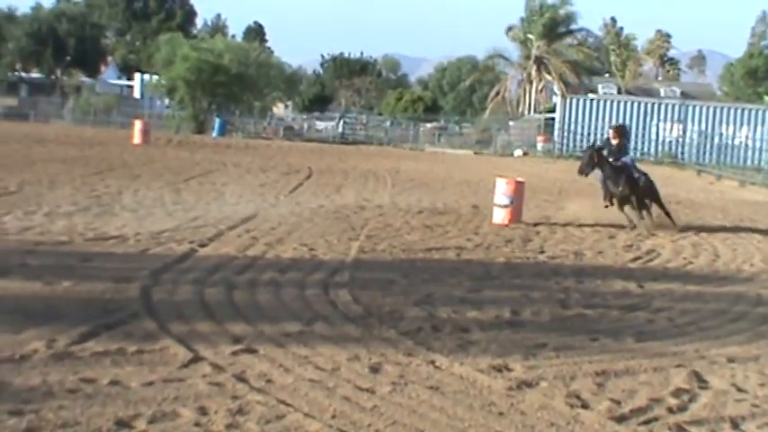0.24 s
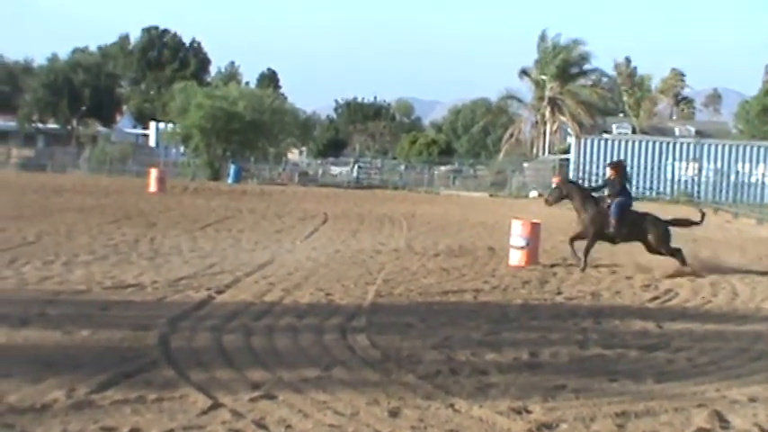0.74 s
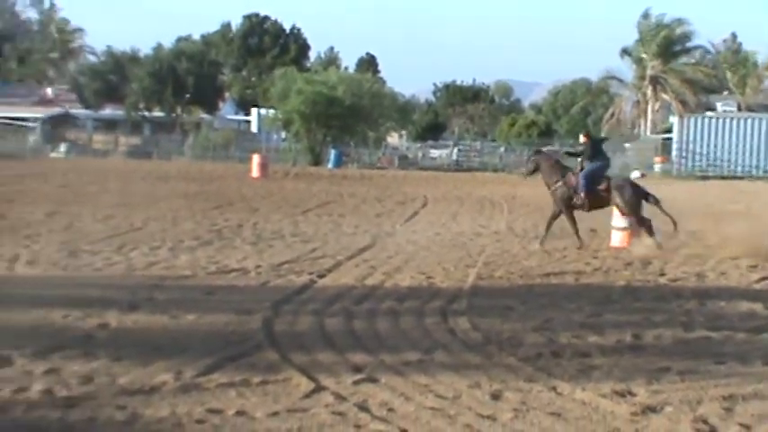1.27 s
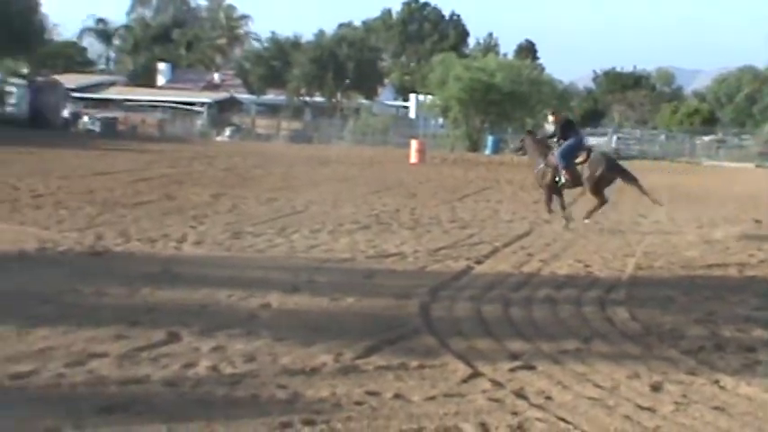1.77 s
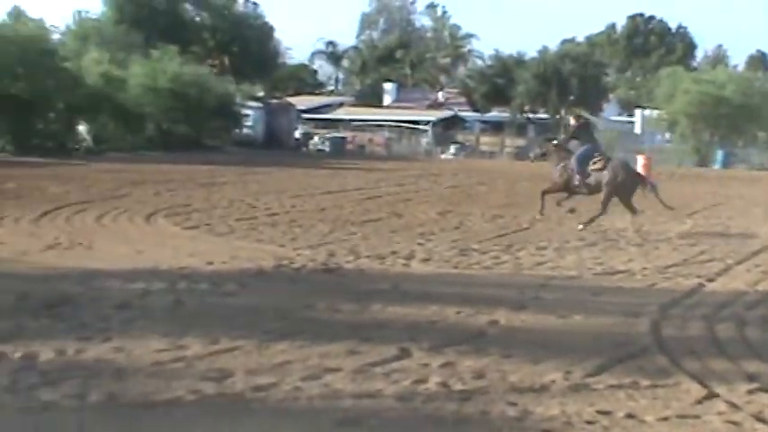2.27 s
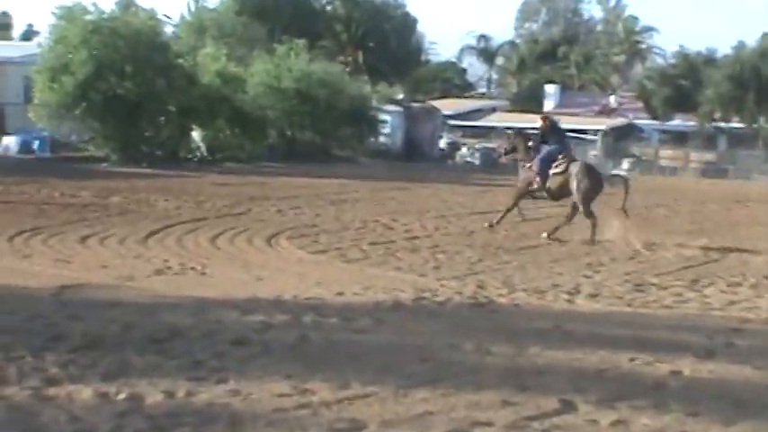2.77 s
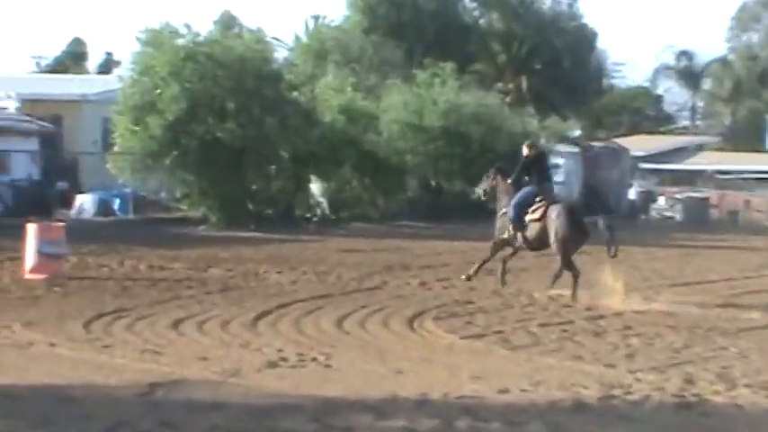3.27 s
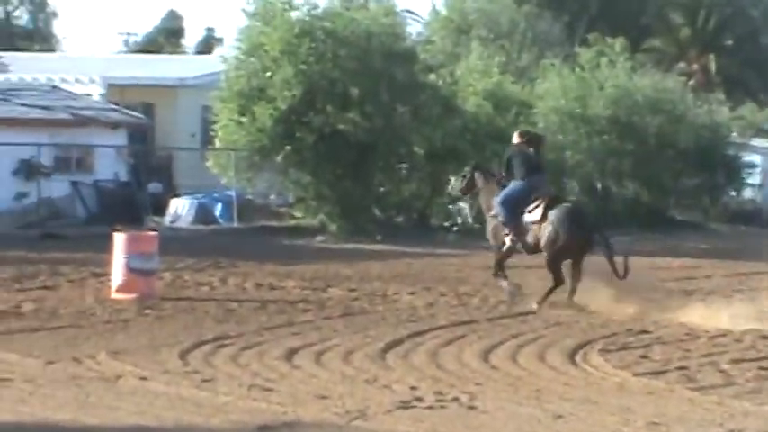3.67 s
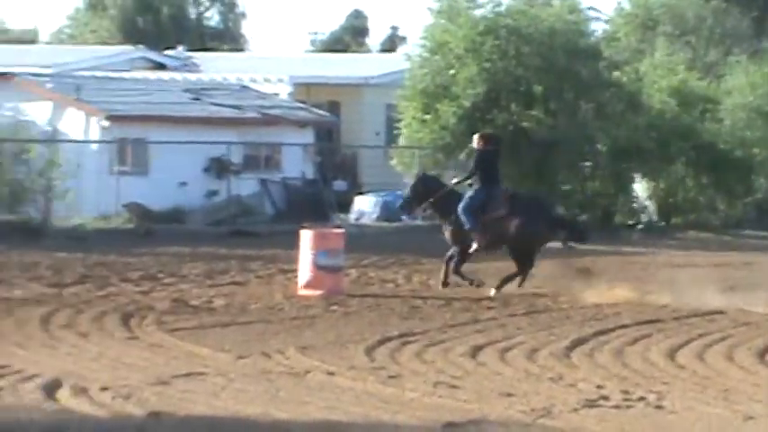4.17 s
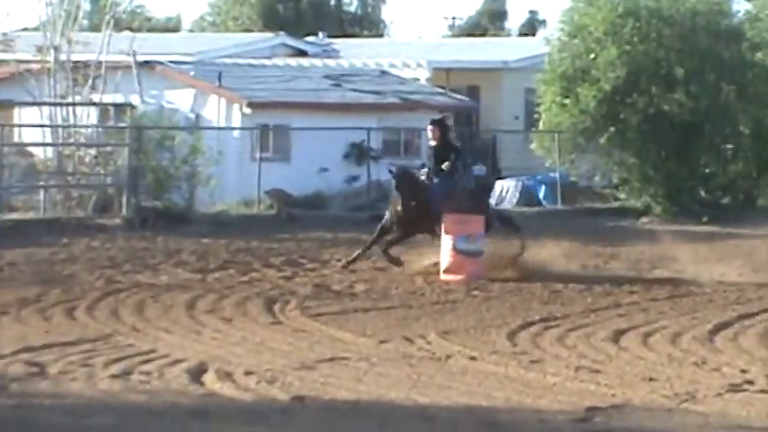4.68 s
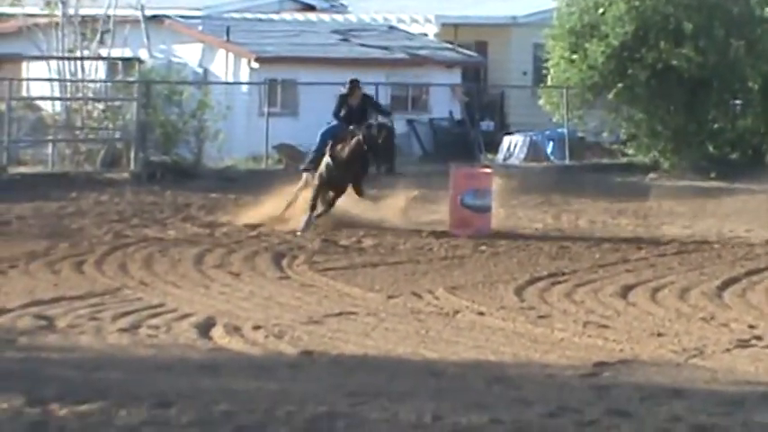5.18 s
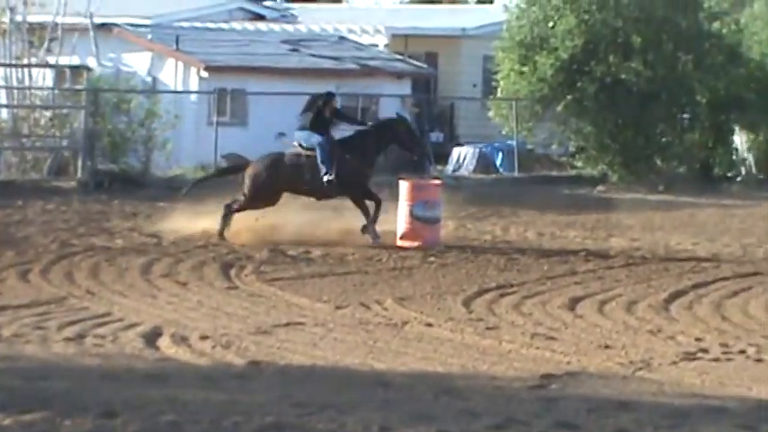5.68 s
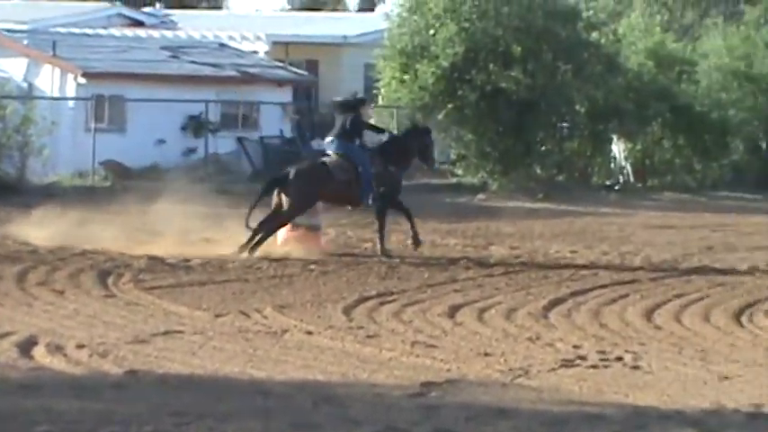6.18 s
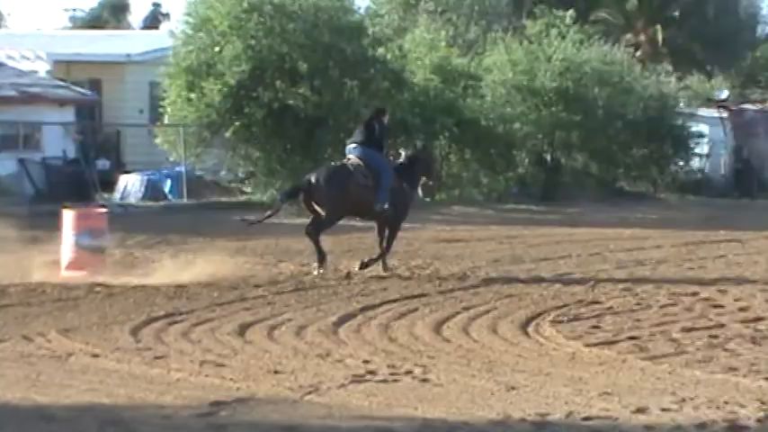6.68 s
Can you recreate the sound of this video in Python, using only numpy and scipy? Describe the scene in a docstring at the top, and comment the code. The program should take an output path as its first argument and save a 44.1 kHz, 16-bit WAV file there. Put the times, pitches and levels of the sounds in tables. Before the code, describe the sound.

Outdoors in an open dirt arena, wind strikes a handheld stereo microphone and dominates. Separate puffs with short lulls come first, then from about two seconds a lasting low roar with dull slaps. Quiet birds chirp and whistle throughout, clearest early on; riding tack ticks and a few sharp smacks snap out, and a faint high insect buzz hangs in the middle. Soft hiss of sand and leaves lies underneath.

```python
"""Gusty wind buffets the two microphone ports of a camera in a sandy arena and dominates the sound. It is
turbulence noise in half-octave bands whose level and sharpness follow puffs, with short dull slaps. Above it
birds whistle and chatter (gliding tones, chopped noise) and an insect buzzes (a wavering tone). Tack ticks
(brief rings), the camera body is knocked (sharp noise bursts), and far sand and leaves hiss (grainy soft
noise)."""
import sys
import numpy as np
from scipy import signal
from scipy.fft import rfft, irfft, next_fast_len
from scipy.io import wavfile
from scipy.ndimage import uniform_filter1d

SR = 44100
rng = np.random.default_rng(int(sys.argv[2]) if len(sys.argv) > 2 else 0)


def persist_wave(psi):
    """Save psi, clipped to +-1, as 16-bit WAV."""
    counts = np.round(np.clip(psi, -1, 1) * 32767).astype(np.int16)
    wavfile.write(sys.argv[1], SR, np.atleast_2d(counts).T)


N = 306054
OPPOSITE = np.array([[1], [-1]])  # signs of a difference signal at the left and right ports

# Strong single eddies striking the ports: time_s, level_db (peak of the part common to both ports)
EDDY_STRIKES = [(0.773, -27.5), (1.332, -33), (2.385, -20), (2.463, -22), (2.805, -25), (2.884, -19),
                (3.233, -17), (3.668, -21), (3.82, -20), (3.982, -19), (4.135, -20), (4.425, -14),
                (4.66, -22), (4.841, -18), (5.05, -20), (5.289, -19), (5.544, -17), (5.826, -20.5),
                (6.228, -21)]


def undb(db):
    """Amplitude ratio of a level: 20 dB is a factor of ten."""
    return 10 ** (np.asarray(db) / 20)


def unit(x):
    """Normalise to unit rms, the root of the mean power."""
    return x / np.sqrt(np.mean(x ** 2))


def curves(table):
    """Linear interpolation of each column after the first, over time in seconds."""
    time_s, *columns = np.transpose(table)
    return [np.interp(np.arange(N) / SR, time_s, column) for column in columns]


def band(x, spectrum, hz=None, octaves=0.49):
    """Linear filtering by a spectrum; with hz, a cosine window on log frequency keeps one band."""
    size = next_fast_len(N)
    log_f = np.log2(np.maximum(np.fft.rfftfreq(size, 1 / SR), 1))
    point_hz, point_db = np.array(spectrum).T
    gain = undb(np.interp(log_f, np.log2(point_hz), point_db, -90, -90))
    if hz:
        gain = gain * np.cos(np.pi / 2 * np.clip((log_f - np.log2(hz)) / octaves, -1, 1))
    return irfft(rfft(x, size) * gain, size)[:N]


def walk(rate):
    """Low-pass random modulation: levels held 1 / rate s, smoothed twice, standard deviation 1."""
    hold = int(SR / rate)
    x = np.repeat(rng.standard_normal(N // hold + 1), hold)
    x = uniform_filter1d(uniform_filter1d(x, hold), hold)[:N]
    return x / x.std()


def flutter(rate, slowest):
    """Band-pass random modulation: a walk less its moving average over 1 / slowest s, at unit rms."""
    x = walk(rate)
    return unit(x - uniform_filter1d(x, int(SR / slowest)))


def panned(x, pan_db):
    """Interaural level difference: left exceeds right by pan_db."""
    return x * undb(np.array([[pan_db], [-pan_db]]) / 2)


def add(out, s, x):
    """Superposition: mix x into out from time s."""
    i = int(s * SR)
    out[:, i:i + x.shape[-1]] += x[..., :N - i]


def wind():
    """Turbulence: eddies of many sizes press on the ports; small ones burst, so upper bands throb together."""
    # Relative spectrum of the pressure common to both ports: frequency_hz, density_db
    alike_spectrum = [(12, -45.5), (20, -7.5), (160, 0.5), (277, -3), (424, -7), (692, -16.5), (1150, -28),
                      (1950, -44.5), (2600, -53.5), (3380, -62), (5720, -120)]
    # Relative spectrum of the pressure of opposite sign at the ports: frequency_hz, density_db
    apart_spectrum = [(12, -35.5), (20, -12), (49, -10), (226, 1), (407, -1), (588, -4.5), (920, -11),
                      (2040, -35), (2600, -41), (3380, -75), (5720, -120)]
    rumble_db, edge_db = gusts()
    blowing = np.arange(N) > 2.5 * SR
    edge_db = edge_db - edge_db[blowing].mean()  # the spectra hold the sharpness of the full wind
    relative_db = rumble_db - rumble_db[blowing].mean()
    lull_db = np.minimum(relative_db, 0)
    # weak wind throbs deeply, full wind roars more evenly
    puffy = np.clip(.75 - 0.034 * uniform_filter1d(edge_db + relative_db, SR // 3), .3, 1.6)
    eddies = 0.48 * flutter(60, 7.5) + 0.93 * flutter(200, 30)
    strokes = flutter(35, 2.4)
    rows = []
    for spectrum, level_db in ((alike_spectrum, 0), (apart_spectrum, -4.5)):
        own = flutter(90, 15)
        out = 0
        for hz in 22 * 2 ** np.arange(0, 7.1, .5):
            octave = np.log2(hz)
            depth_db = np.interp(octave, np.log2([60, 250, 600, 1500]), [.3, 2.2, 2.6, 3.6])
            gritty = np.clip(np.log2(hz / 300) / 3, 0, 1)  # slower strokes reach the upper bands only
            motion = puffy * eddies + .5 * own + 0.7 * gritty * strokes
            throb = undb(depth_db * motion + 0.8 * flutter(30, 3.7))
            stays = np.interp(octave, np.log2([60, 200]), [.2, 0])  # the deepest rumble sinks less in a lull
            tilt = np.interp(octave, np.log2([200, 500, 1500]), [0, .95, 1.2])
            noise = band(rng.standard_normal(N), spectrum, hz)
            out = out + noise * unit(throb) * undb(tilt * edge_db - stays * lull_db)
        rows.append(out * undb(level_db))
    alike, apart = np.array(rows) / rows[0][blowing].std() * undb(rumble_db)
    return np.array([alike + apart, alike - apart])


def gusts():
    """Power addition: puffs rise, hold and decay over a lull; weaker flow has less fine turbulence."""
    # Puffs on the ports, the last a lasting blow: full_s (end of the rise), held_s, rumble_db
    puffs = [(0, 0.067, -24), (0.191, 0.055, -23.5), (0.299, 0.067, -26.5), (0.371, 0.15, -17),
             (.55, 0.13, -25), (0.701, 0.024, -21.5), (.76, 0.016, -22.5), (.83, 0.057, -24),
             (.97, 0.18, -33), (1.17, 0.14, -28), (1.332, 0.073, -21), (1.46, 0.054, -24.5),
             (1.53, 0.35, -18.5), (1.981, 0.12, -32.5), (2.129, 0.03, -26.5), (2.17, 6.5, -19)]
    # The wind freshens: time_s, swell_db, sharpness_db (relative upper-band level)
    freshening = [(0, -1, -13), (1, 1, -16.5), (1.7, 0, -11.5), (2.5, 1, -10), (3.3, 1, -9), (3.7, 0, -8.5),
                  (4.2, 1, -3.5), (4.5, -2.5, -4), (4.8, -0.5, -2), (5.5, -1, -5), (5.9, 1.5, -10.5),
                  (6.3, -1, -5), (6.9, 1.5, -8.5)]
    rise_s, fall_s, lull_db = 0.011, 0.023, -41
    dull_per_db, dullest_db, full_blow_db = 1.17, -14, -20.5  # dulling stops 14 dB under a full blow
    surge_db, surge_s = 4, .014  # brief sharpening just after each slap begins
    t = np.arange(N) / SR
    power = undb(lull_db) ** 2
    for full_s, held_s, level_db in puffs:
        rise = np.clip((t - full_s) / rise_s + 1, 0, 1)
        fall = np.exp(-np.maximum(t - full_s - held_s, 0) / fall_s)
        power = power + (undb(level_db) * rise * fall) ** 2
    rumble_db = 10 * np.log10(power)
    swell_db, sharp_db = curves(freshening)
    surges = sum(np.exp(-((t - s) / surge_s - .5) ** 2) for s, _ in EDDY_STRIKES)
    dulling_db = dull_per_db * np.clip(rumble_db - full_blow_db, dullest_db, 0)
    return rumble_db + swell_db, sharp_db + surge_db * surges + dulling_db


def slaps():
    """Pressure impulses: each strong eddy is a short dull noise burst, largely opposite at the two ports."""
    out = np.zeros((2, N))
    t = np.arange(1500) / SR
    low_pass = signal.butter(5, 850, fs=SR, output="sos")
    high_pass = signal.butter(2, 220, "high", fs=SR, output="sos")
    soft = np.vstack([low_pass, high_pass])
    burst = t / .003 * np.exp(1 - t / 0.0024)
    for s, level_db in EDDY_STRIKES:
        alike, apart = signal.sosfilt(soft, rng.standard_normal((2, len(t))) * burst)
        gain = undb(level_db) / np.abs(alike).max()
        add(out, s - .0012, gain * np.array([alike + 1.98 * apart, alike - 1.55 * apart]))
    return out


def birds():
    """Frequency modulation: slightly hoarse whistles glide on parabolas, from either side, with soft echoes."""
    # The clearest notes: start_s, length_s, start_hz, mid_hz, end_hz, level_db
    clear_notes = [(0.005, 0.037, 3050, 3200, 2950, -58), (0.155, 0.028, 4500, 4350, 4250, -57),
                   (0.64, 0.13, 2050, 2020, 2050, -60), (0.79, 0.028, 3600, 3370, 3620, -54),
                   (0.84, 0.06, 4650, 4700, 4680, -61), (0.08, 0.033, 3710, 4630, 4660, -54),
                   (0.11, 0.057, 4770, 3770, 3370, -53.5), (0.255, 0.071, 4740, 4770, 4650, -58),
                   (0.535, .075, 4600, 4570, 4640, -64), (0.29, 0.042, 4020, 3440, 3050, -57),
                   (0.33, 0.048, 2990, 3650, 4760, -57.5), (0.47, 0.045, 3530, 3050, 2850, -59),
                   (0.612, 0.09, 4650, 3600, 2780, -58), (0.73, 0.041, 3860, 4800, 4470, -56.5),
                   (0.87, 0.062, 1990, 1955, 1920, -52), (0.85, 0.059, 3620, 3640, 3700, -55),
                   (1.372, 0.044, 4750, 4460, 4460, -51), (1.43, 0.025, 3210, 3100, 2910, -53),
                   (1.58, 0.14, 4270, 4360, 4380, -53.5), (1.75, 0.02, 2800, 2930, 3000, -49),
                   (1.79, 0.02, 3640, 3600, 3500, -49), (1.81, 0.028, 4300, 4160, 4100, -46),
                   (2.028, 0.04, 4700, 4560, 4650, -51), (2.03, 0.055, 2280, 2280, 2600, -53),
                   (2.07, 0.044, 3220, 3130, 2970, -50), (2.12, 0.057, 2900, 3020, 3250, -54),
                   (2.12, .065, 3680, 3650, 3600, -59), (2.405, 0.048, 3980, 4150, 4000, -50.5),
                   (2.975, .04, 4000, 3750, 3500, -59), (3.325, .042, 4550, 4800, 3800, -60),
                   (3.395, 0.025, 3600, 3850, 3950, -61), (3.425, 0.07, 4350, 4430, 4280, -58),
                   (3.6, 0.062, 3840, 3020, 2780, -54.5), (4.23, .045, 3100, 2860, 2500, -58),
                   (4.372, 0.026, 5400, 5840, 5200, -59), (4.42, 0.07, 4780, 4700, 4420, -59),
                   (4.48, 0.045, 4020, 3900, 3900, -53.5), (4.516, 0.051, 4800, 4360, 4480, -47.5),
                   (4.575, 0.025, 3986, 3910, 3800, -51.5), (5.12, 0.023, 4330, 4580, 4860, -57),
                   (5.14, 0.04, 4300, 3750, 3400, -55.5), (5.345, 0.025, 3300, 3800, 4500, -60),
                   (5.35, 0.039, 3250, 2950, 2650, -60), (4.73, .04, 4450, 4450, 4350, -60),
                   (5.21, 0.026, 5840, 5800, 5820, -52.5), (5.23, 0.022, 4380, 4380, 4500, -52),
                   (5.48, 0.08, 3280, 4200, 3900, -59), (5.56, 0.076, 3550, 3040, 2250, -53),
                   (5.7, .05, 3000, 3450, 3500, -62), (5.85, 0.03, 4250, 4600, 4650, -54),
                   (5.965, .035, 3200, 3100, 3200, -58), (6.03, 0.03, 4760, 4360, 4490, -58.5),
                   (6.23, 0.074, 3350, 4020, 3950, -53.5), (6.345, 0.035, 4470, 4770, 4320, -57),
                   (6.305, 0.06, 3330, 3140, 2730, -47.5), (6.36, 0.037, 3150, 2950, 2600, -57),
                   (6.55, 0.04, 4060, 3630, 3290, -58), (6.59, 0.029, 2940, 2970, 3020, -54),
                   (6.82, 0.045, 4450, 4780, 4300, -62), (6.88, 0.056, 3480, 4400, 2980, -59)]
    notes = [*clear_notes, *far_birds(count=220)]
    direct = np.zeros((2, N))
    waver, shiver = walk(400), walk(300)
    sides = rng.choice([-1, 1], (len(notes), 1))
    for (s, length, start_hz, mid_hz, end_hz, level_db), side in zip(notes, sides):
        u = np.arange(int(length * SR)) / (length * SR)
        here = slice(int(s * SR), int(s * SR) + len(u))
        # parabola through the start, middle and end pitches
        pitch = start_hz * (1 - u) * (1 - 2 * u) + 4 * mid_hz * u * (1 - u) + end_hz * u * (2 * u - 1)
        hoarse = 0.0007 / max(length, .02)  # short chips are rough, long whistles cleaner
        broken = 1 + np.clip(.6 - length / .25, .12, .45) * shiver[here]
        phase = 2 * np.pi * np.cumsum(pitch * (1 + hoarse * waver[here])) / SR
        fade = np.clip(np.minimum(u, 1 - u) * length / 0.0027, 0, 1)
        pair = np.sin(phase + .55 * side * OPPOSITE)  # a phase lead at one port shows the direction
        add(direct, s, panned(undb(level_db) * fade * broken * pair, 1.2))
    t = np.arange(6000) / SR
    echoes = rng.standard_normal((2, len(t))) * np.exp(-t / .045) * (t > .008)
    return direct + undb(-33.5) * signal.fftconvolve(direct, echoes, axes=1)[:, :N]


def far_birds(count):
    """Random scatter: chance notes, mostly fainter, as rows of start, length, three pitches and level."""
    s, pitch, bend, fall, length, loud = rng.random((count, 6)).T
    start_s = s * (N / SR - .1)
    hz = 2900 + 1700 * pitch
    mid_hz, end_hz = hz + 900 * (bend - .5), hz - 1600 * (fall - .3)
    return np.transpose([start_s, .015 + .04 * length, hz, mid_hz, end_hz, -71 + 6 * loud])


def whistle():
    """Phase continuity: one unbroken bird tone bends gently, its phase the integral of its pitch."""
    # Course of the tone: time_s, pitch_hz, level_db
    course = [(0.9, 3950, -62), (0.93, 3830, -55), (0.96, 3970, -64), (1.08, 3900, -53.5),
              (1.18, 3800, -56), (1.208, 3900, -51), (1.255, 3660, -52), (1.278, 3800, -60)]
    hz, level_db = curves(course)
    t = np.arange(N) / SR
    on = np.clip(np.minimum(t - course[0][0], course[-1][0] - t) / .005, 0, 1)
    phase = 2 * np.pi * np.cumsum(hz) / SR
    return on * undb(level_db) * np.sin(phase + .55 * OPPOSITE)


def chatter():
    """Amplitude modulation: raspy sparrow bursts of narrow noise, chopped fast and uneven between the ports."""
    # Bursts: start_s, length_s, centre_hz, width_hz, level_db
    bursts = [(1.75, 0.032, 4600, 3000, -59), (1.84, .05, 4600, 1200, -62), (2.379, 0.11, 4700, 2600, -57),
              (2.478, 0.056, 4100, 1500, -58), (4.366, .035, 5370, 1200, -59),
              (4.458, 0.11, 8200, 1800, -65), (4.459, .09, 4700, 1200, -60), (4.625, .04, 4270, 2000, -55),
              (5.198, .05, 5600, 1600, -61), (5.99, .045, 5740, 700, -61), (6.0, 0.085, 3700, 1500, -60)]
    rasp_hz, rasp_depth = 84.6, 0.72
    out = np.zeros((2, N))
    uneven = walk(60)
    for s, length, hz, width, level_db in bursts:
        u = np.arange(int(length * SR)) / (length * SR)
        throat = signal.butter(2, [hz - width / 2, hz + width / 2], "band", fs=SR, output="sos")
        alike, apart = signal.sosfilt(throat, rng.standard_normal((2, SR // 5)))[:, :len(u)]
        rasp_phase = 2 * np.pi * rasp_hz * length * u + uneven[int(s * SR):][:len(u)]
        notes = 1 + rasp_depth * np.sin(rasp_phase)
        pair = unit(alike + 0.6 * apart * OPPOSITE)
        add(out, s, undb(level_db) * np.sqrt(np.sin(np.pi * u)) * notes * pair)
    return out


def insect():
    """Random frequency modulation: a tone wavering fast in pitch and a little in strength is a narrow buzz."""
    # One buzz: start_s, end_s, pitch_hz, level_db
    buzz = (2.33, 3.675, 6640, -67)
    start, end, hz, level_db = buzz
    waver_hz = 40  # rms
    t = np.arange(N) / SR
    on = np.clip(np.minimum(t - start, end - t) / 0.0088, 0, 1)
    phase = 2 * np.pi * np.cumsum(hz + waver_hz * flutter(170, 30)) / SR
    shiver = unit(1 + .18 * flutter(250, 40))
    tone = np.sin(phase + .3 * OPPOSITE)  # the phase lead puts it to one side
    return np.sqrt(2) * on * undb(level_db) * shiver * tone


def ticks():
    """Damped resonance: struck buckles and straps give a millisecond ring with a rustling tail; two lower rings
    near 4.5 kHz are knocks on the camera body."""
    # The loudest ticks, with two knocks on the camera body (5.878 and 6.411 s): time_s, level_db, ring_hz
    loud_ticks = [(0.2673, -51.5, 11800), (0.3606, -39.5, 8200), (0.381, -47, 9400), (1.0124, -41.5, 7460),
                  (1.082, -46, 11500), (1.4042, -41, 7800), (1.4222, -41, 8000), (1.5409, -45, 7800),
                  (1.7823, -46, 8000), (1.8098, -44, 8230), (1.9105, -34.5, 7400), (2.1435, -41, 12900),
                  (2.5124, -44, 7140), (2.9682, -49.5, 8000), (2.9801, -46.5, 8350), (3.268, -48, 8950),
                  (3.4126, -50, 8800), (3.5811, -34, 8900), (3.633, -45.5, 7650), (3.9434, -47.5, 7920),
                  (5.7144, -50, 9470), (5.878, -44, 4400), (6.2215, -42, 8250), (6.335, -50, 8550),
                  (6.411, -41.5, 4550), (6.6826, -47.5, 8450)]
    out = np.zeros((2, N))
    t = np.arange(2000) / SR
    rows = [*loud_ticks, *faint_ticks(count=110)]
    for (s, level_db, hz), (low, high) in zip(rows, rng.random((len(rows), 2))):
        edges_hz = [hz * (.95 - .15 * low), min(hz * (1.15 + .6 * high), 13500)]
        bright = signal.butter(3, edges_hz, "band", fs=SR, output="sos")
        alike, apart = signal.sosfilt(bright, rng.standard_normal((2, len(t))))
        # low-pitched ticks ring on when struck hard
        ring_on = 0.71 * (level_db > -47) * np.clip((7500 - hz) / 300, 0, 1)
        lingers = ring_on * np.minimum(t / .002, 1) * np.exp(-t / 0.011)
        ring = np.sin(2 * np.pi * hz * t) * (.5 * np.exp(-((t - .002) / 0.002) ** 2) + lingers)
        tail = 0.56 * np.exp(-t / 0.0095) * np.minimum(t / 0.0031, 1)
        rustle = 0.91 * np.exp(-((t - .002) / 0.0012) ** 2) + tail
        add(out, s - .0008, undb(level_db) * (ring + rustle * (alike + .25 * apart * OPPOSITE)))
    return out


def faint_ticks(count):
    """Random scatter: an uneven crackle, as rows of time, level and ring pitch."""
    s, loud, ring = rng.random((count, 3)).T
    return np.transpose([.01 + s * (N / SR - .1), -63 + 9 * loud ** 2, 4500 + 8000 * ring])


def body_ring():
    """Modal decay: the loudest smack sets the camera body ringing, opposite in sign at the ports."""
    # Modes of the body: frequency_hz, level_db, decay_s
    modes = [(2160, -27, 0.0076), (9250, -30, .0035)]
    out = np.zeros((2, N))
    t = np.arange(2000) / SR
    body = sum(undb(level_db) * np.sin(2 * np.pi * hz * t) * np.exp(-t / decay) for hz, level_db, decay in modes)
    add(out, 3.581, body * np.minimum(t / .001, 1) * np.array([[1.2], [-.8]]))
    return out


def smacks():
    """Impulsive noise: sharp broad bursts close by, each a few ms with a short exponential tail."""
    # Smacks: start_s, level_db, length_s, apart_db (part opposite left and right)
    strikes = [(1.305, -47, 0.011, -6), (1.4207, -34.5, 0.0016, -6), (1.9103, -30, 0.0025, -8),
               (3.5782, -31, 0.0073, -3), (3.946, -50.5, 0.0087, -4), (5.017, -57, 0.002, -6)]
    # Relative spectrum of the smacks: frequency_hz, density_db
    colour = [(710, -39), (1200, -3), (1510, -10.5), (2250, -8.5), (4040, -16.5), (4360, -11.5),
              (8630, -24.5), (16000, -41)]
    out = np.zeros((2, N))
    t = np.arange(2000) / SR
    alike, apart = (unit(band(rng.standard_normal(N), colour)) for _ in range(2))
    for s, level_db, length, apart_db in strikes:
        rise = np.minimum(t / (0.48 * length), 1)
        burst = np.exp(-(t / max(length, .0003)) ** 4)
        tail = 0.36 * np.exp(-t / (2.5 * length))
        here = slice(int(s * SR), int(s * SR) + len(t))
        pair = alike[here] + undb(apart_db) * apart[here] * OPPOSITE
        add(out, s, undb(level_db) * rise * (burst + tail) * pair)
    return out


def hiss():
    """Partial coherence: soft noise with scattered grains, more alike left and right towards the top."""
    # Relative spectrum of far sand, leaves and town: frequency_hz, density_db
    far_spectrum = [(180, -29.5), (300, -4), (425, -16), (614, -19.5), (1120, -23.5), (1580, -27.5),
                    (2700, -36), (4590, -39), (6850, -50), (8360, -47), (16000, -58)]
    # Course of the treble, of which only the change counts: time_s, mid_db, top_db
    treble_course = [(0, -77, -75), (.8, -67, -70.5), (1.5, -65.5, -68), (2.3, -66.5, -69), (3, -73, -72),
                     (3.55, -71.5, -68), (4.15, -72.5, -75.5), (4.5, -65.5, -70), (4.9, -75.5, -77),
                     (5.25, -72.5, -74.5), (5.55, -75.5, -73.5), (5.9, -70, -71.5), (6.9, -76, -72.5)]
    mid_db, top_db = curves(treble_course)
    impulses = (rng.random(N) < 60 / SR) * rng.exponential(1, N)  # about 60 a second
    grains = 1 + .5 * uniform_filter1d(impulses, size=130) * 130
    out, surge = 0, flutter(30, 5)
    for hz in 300 * 2 ** np.arange(0, 6, .5):
        high = np.clip(np.log2(hz / 4500), 0, 1)
        mid_change_db = (mid_db - mid_db.mean()) * np.clip(hz / 5500, 0, 1)
        change_db = (1 - high) * mid_change_db + high * (top_db - top_db.mean())
        alike, apart = (band(rng.standard_normal(N), far_spectrum, hz) for _ in range(2))
        apart_db = np.interp(np.log2(hz), np.log2([2000, 5000, 12000]), [-3, -4, -11])
        pair = alike * grains ** high + undb(apart_db) * apart * OPPOSITE
        out = out + undb(change_db + 1.0 * walk(14) + 1.1 * high * surge) * pair
    return unit(out) * undb(-42.5)


def scene():
    """Superposition of all sources at the two microphone ports."""
    air = wind() + slaps()
    animals = birds() + whistle() + chatter() + insect()
    clatter = ticks() + body_ring() + smacks()
    return air + animals + clatter + hiss()


def record(dry):
    """Saturation and band limiting: the camera rounds the loudest peaks and cuts the top."""
    top_hz = 15900
    rounded = np.tanh(0.64 * dry) / 0.54
    return signal.sosfilt(signal.ellip(8, .2, 70, top_hz, fs=SR, output="sos"), rounded)


dry = scene()
out = record(dry)
persist_wave(out)
```